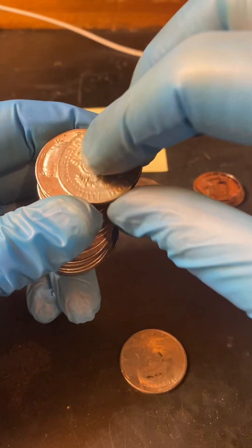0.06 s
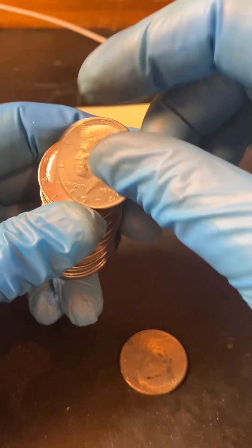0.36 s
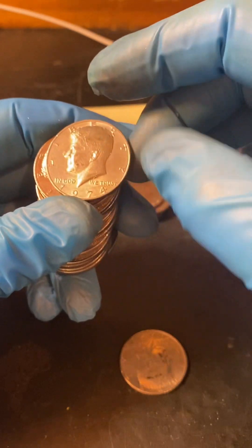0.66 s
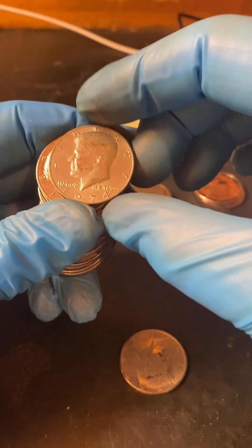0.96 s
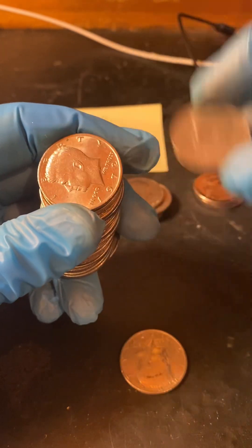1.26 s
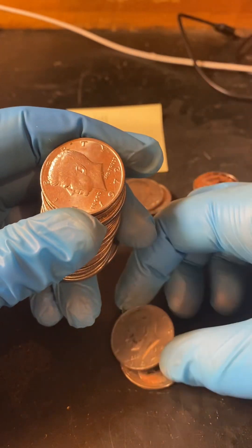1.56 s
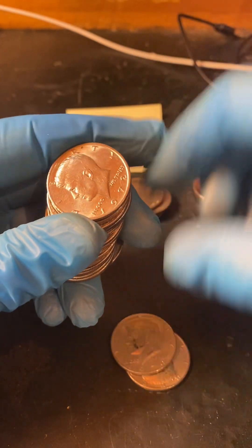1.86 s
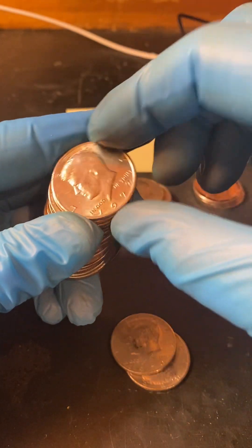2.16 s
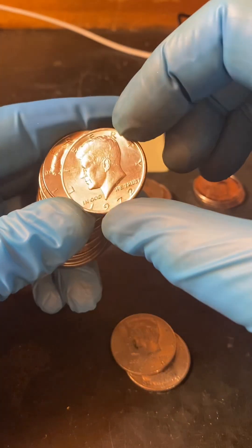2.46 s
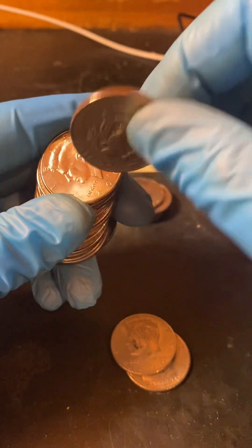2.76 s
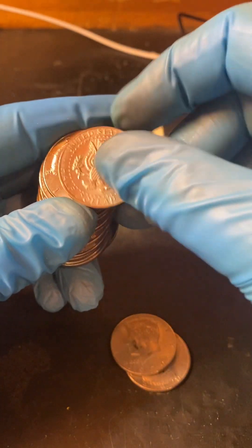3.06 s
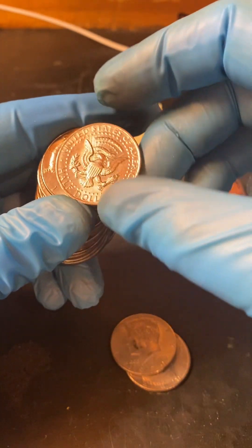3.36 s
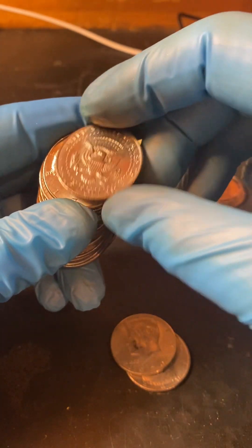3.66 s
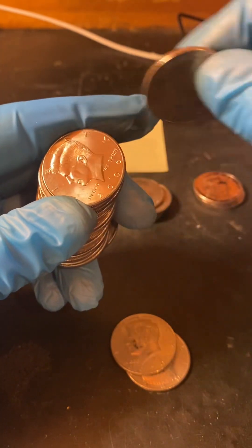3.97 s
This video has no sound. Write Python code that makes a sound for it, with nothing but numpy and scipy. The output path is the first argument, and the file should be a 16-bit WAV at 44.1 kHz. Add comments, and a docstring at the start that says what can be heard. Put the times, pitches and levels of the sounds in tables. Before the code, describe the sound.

Large coins clink and rasp as they are turned over and set on each other.

```python
"""Light clinks sound over a quiet room's hum as gloved hands turn over two large coins on a held stack.
The first is then laid on a coin lying on the table, and the table top thuds beneath it.
Each contact is a crack plus a modal ring that the fingers cut short; milled rims rasp as they slide.
A close two-port microphone ducks after the loudest clinks."""
import sys
import numpy as np
from scipy import signal
from scipy.fft import rfft, irfft, next_fast_len
from scipy.io import wavfile
from scipy.ndimage import uniform_filter1d, minimum_filter1d

SR = 44100
rng = np.random.default_rng(int(sys.argv[2]) if len(sys.argv) > 2 else 0)


def pcm_store(signal):
    """Save signal as 16-bit PCM."""
    levels = np.round(np.clip(np.atleast_2d(signal), -1, 1) * 32767)
    wavfile.write(sys.argv[1], SR, levels.astype(np.int16).T)


N = 176400


def amp(db):
    """Amplitude ratio of a level in decibels."""
    return 10 ** (np.asarray(db) / 20)


def unit(x):
    """Normalisation to rms 1."""
    return x / np.sqrt(np.mean(x ** 2) + 1e-20)


def along(points, hz):
    """Interpolation of (Hz, value) points over log frequency."""
    f, v = np.transpose(points)
    return np.interp(np.log(hz + 1), np.log(f + 1), v)


def filtered(x, response):
    """Linear filtering: the spectrum times a frequency response."""
    n = x.shape[-1]
    m = next_fast_len(n + 8192)
    return irfft(rfft(x, m) * response(np.fft.rfftfreq(m, 1 / SR)), m)[..., :n]


def noise(colour, size, tilt_db=0):
    """Spectral shaping: noise of rms 1, tilted by tilt_db per octave from 3 to 12 kHz."""
    white = rng.standard_normal(size)
    return unit(filtered(white, lambda hz: amp(along(colour, hz) + tilt_db * np.log2(hz.clip(3e3, 12e3)))))


def add(track, s, sound):
    """Superposition of a sound starting at s seconds."""
    i = max(round(s * SR), 0)
    track[i:i + len(sound)] += sound[:max(len(track) - i, 0)]


def ring(modes, t, t60, scatter_db=1.1, detune=.004, rise_s=.0009):
    """Damped free vibration: the modes vary a little with each strike and grip."""
    tones = sum(amp(db + scatter_db * rng.normal())
                * np.sin(2 * np.pi * (hz * (1 + detune * rng.normal()) * t + rng.random()))
                for hz, db in modes)
    return np.sqrt(2) * tones * amp(-60 * t / t60) * (1 - np.exp(-t / rise_s))


def room_tone(mid_db=-35, side_db=-50.5, left_db=1.4):
    """Broadband ventilation noise, with a hum that wavers as narrow-band noise does."""
    # Noise in phase (mid) and in antiphase (side) at the ports. Each row: frequency in Hz, level in dB.
    mid_colour = [(25, -46), (32, -37), (40, -15), (53, -7), (76, -2), (97, -13.5), (130, -4), (157, -12),
                  (212, -13), (310, -14.5), (400, -20.5), (677, -27.5), (1230, -34), (5570, -50.5),
                  (7300, -61), (10500, -59.5), (13500, -75), (16000, -86)]
    side_colour = [(60, -28), (156, -8), (301, -9.5), (698, 0), (1740, -24.5), (2650, -20), (8510, -33),
                   (13900, -47), (16000, -58)]
    # Each row: centre in Hz, level in dB, half-width in Hz.
    hum_bands = [(66.2, -42, 8.2), (132.06, -36, 4.5), (205.5, -48, 14), (471.4, -56, 7), (891, -65.5, 9)]
    mid = amp(mid_db) * noise(mid_colour, N)
    side = amp(side_db) * noise(side_colour, N)
    lean = filtered(mid, lambda hz: (amp(left_db) - 1) * ((hz > 200) & (hz < 1500)))
    hum = sum(amp(db) * unit(filtered(rng.standard_normal(N), lambda f: 1 / (1 + ((f - hz) / width) ** 2)))
              for hz, db, width in hum_bands)
    return np.array([mid + hum + side + lean, mid + hum - side - lean])


def room(x, tail_db=-25, early_db=-14, early_t60=.04):
    """Reflection: early echoes from table and hands, and the room's short reverberation."""
    # Each row: frequency in Hz, reverberation time in seconds.
    decay_times = [(200, .45), (1000, 0.5), (4000, 0.3), (7500, 0.2), (12000, .15)]
    hz, t, spectra = signal.stft(rng.standard_normal((2, SR // 2)), SR, nperseg=256)
    tail = signal.istft(spectra * amp(-60 * t / along(decay_times, hz)[:, None]), SR, nperseg=256)[1]
    t = np.arange(tail.shape[1]) / SR
    early = rng.standard_normal(tail.shape) * amp(-60 * t / early_t60)
    echoes = amp(tail_db) * tail / np.linalg.norm(tail[0])
    echoes += amp(early_db) * early / np.linalg.norm(early[0])
    return signal.fftconvolve(x[None], echoes, axes=1)[:, :N]


def gloves():
    """Friction noise: rubber hisses softly as it is drawn over metal."""
    # Each row: frequency in Hz, level in dB.
    colour = [(500, -22), (2500, -6.5), (5300, 0), (8500, 0), (12000, -1), (14000, -10), (16000, -8)]
    # Each row: middle in seconds, half-length in seconds, level in dB.
    rubs = [(0.12, 0.07, -57), (1.87, 0.031, -46), (3.01, .05, -56.5), (3.714, .08, -59.5)]
    t = np.arange(N) / SR
    return noise(colour, N) * sum(amp(db) * np.exp(-((t - s) / half) ** 2) for s, half, db in rubs)


def knocks():
    """Impact excitation: the table top thuds in its modes under the landing coin."""
    # Each row: start in seconds, gain in dB.
    landings = [(1.497, -32), (1.657, -26), (1.709, -29.5)]
    # Each row: frequency in Hz, level in dB.
    board_modes = [(240, -8), (345, -6), (495, 1), (620, -1), (790, -2), (1080, -9), (1400, -13),
                   (2330, -7)]
    out, t = np.zeros(N), np.arange(SR // 4) / SR
    for s, db in landings:
        add(out, s, amp(db) * ring(board_modes, t, t60=.08))
    return out


def coin_at(s, to_table_s=1.3, second_s=2.0, lifted_s=2.66):
    """Support and grip govern a disc's vibration: its colour, modes, crack rise and ring T60 at time s."""
    # Contact spectra (colours) and resonances (modes). Each row: frequency in Hz, level in dB.
    first_colour = [(300, -26.5), (1400, -19.5), (2300, -7), (3020, -3.5), (3700, -7), (4400, -4),
                    (5050, 6), (6000, -4), (8200, 2), (10000, -4), (12500, -1), (14000, -13), (16000, -15)]
    first_modes = [(5060, -2), (5589, -14), (7750, -12), (8520, -8), (12450, -11), (3030, -14)]
    table_colour = [(200, -20), (480, -5), (1500, -8.5), (2500, -3), (3350, 4.5), (5400, -2.5), (7900, 3),
                    (9600, -5), (12400, 3), (14000, -11), (16000, -22)]
    table_modes = [(7360, -5), (7720, -12), (8030, -13), (12420, -3.5), (12200, -13)]
    second_colour = [(300, -27.5), (1500, -22), (2200, -7), (3200, -11), (4300, -7), (5400, 2), (6600, 2),
                     (8700, 1), (10300, -5), (12100, -1), (13500, -11), (16000, -17)]
    second_modes = [(11940, 1), (11750, -18), (12080, -15), (7650, -14), (8700, -15), (6700, -13),
                    (5420, -20)]
    prised_modes = [(3860, -12), (5179, -6), (8306, -4), (9970, -6), (12130, -1)]
    stack_rise_s, table_rise_s, gripped_t60, loose_t60 = .0009, .000297, .014, .029
    if s < to_table_s:
        return first_colour, first_modes, stack_rise_s, gripped_t60
    if s < second_s:
        return table_colour, table_modes, table_rise_s, loose_t60
    if s < lifted_s:  # the second coin's edge is prised off the stack
        return second_colour, prised_modes, stack_rise_s, gripped_t60
    return second_colour, second_modes, stack_rise_s, loose_t60


def slides(slips_per_s=900, scatter_db=4, slip_t60=.004, hiss=.6, ring_db=-10):
    """Stick-slip friction: a milled rim ticks unevenly, rasping and exciting the coin's modes."""
    # Each row: time of peak pressure, 30 dB swell and 30 dB fade, all in seconds,
    # level in dB, tilt in dB per octave.
    strokes = [(.182, .032, .05, -24.5, -2), (.16, .08, .03, -43, -3), (1.503, .0034, .04, -41, -6),
               (1.073, .025, .05, -43, -4), (1.1, .036, .012, -46.5, 5), (1.667, .028, .06, -19.5, -2.5),
               (1.712, .04, .04, -27, -1), (2.7095, .055, .016, -29, -5), (2.675, .04, .06, -44, -3),
               (2.917, .006, .06, -36, -3), (3.064, .02, .032, -17.5, 1), (3.094, .03, .022, -24, 0),
               (3.857, .06, .022, -27.5, -2)]
    out, t = np.zeros(N), np.arange(SR // 2) / SR
    middle, short = t[-1] / 2, t[:SR // 20]
    for s, swell, fade, db, tilt_db in strokes:
        colour, modes, *_ = coin_at(s)
        slipping = rng.random(len(t)) < slips_per_s / SR
        slips = slipping * amp(scatter_db * np.clip(rng.standard_normal(len(t)), -2, 2))
        grain = unit(signal.fftconvolve(slips, amp(-60 * short / slip_t60))[:len(t)])
        rasp = unit((grain + hiss) * noise(colour, len(t), tilt_db))
        singing = unit(signal.fftconvolve(slips, ring(modes, short, t60=.014))[:len(t)])
        # Pressure swells, then drops ever faster as the coin stops.
        pressure = amp(-30 * np.where(t < middle, (middle - t) / swell, ((t - middle) / fade) ** 2))
        sound = amp(db) * pressure * (rasp + amp(ring_db) * singing)
        add(out, s - middle, sound[max(round((middle - s) * SR), 0):])
    return out


def clinks(crack_t60=.0085):
    """Impact of coin on coin: a broadband crack and a damped modal ring."""
    # Each row: start in seconds, level in dB, crack tilt in dB per octave, relative ring gain in dB.
    contacts = [ (.086, -27.5, 10, -4.5), (.124, -43, 2, -4), (.158, -33, 6, -8), (.172, -20, -1, -8),
                (.194, -20.5, 4, 4), (.201, -21, -0.5, -2), (.212, -19.5, -3, -1), (.2938, -20, 0.5, 6),
                (.355, -22, -1, 2), (.367, -26.5, 2.5, -1), (.418, -41, 1, -2), (.431, -31, 1, -4),
                (.4425, -25, 5, -9), (.4482, -18.5, 4.5, -4), (.9688, -34, 2, -1),
                (1.4967, -11.5, -2.5, -20), (1.5017, -24, -3, -10), (1.639, -34.5, -3, -8),
                (1.645, -19, -2.5, 2), (1.6525, -15, -3, 2), (1.6567, -9.5, -1, -3), (1.6636, -10, 3, 10.5),
                (1.668, -15, 1, 1), (1.683, -22, -1, 2), (1.690, -18, 3, 2), (1.699, -22, 5, 1),
                (1.7044, -14.5, 1.5, 1), (1.710, -14, 1, -2), (1.727, -18, 1.5, -4), (1.740, -24, 2.5, -6),
                (1.750, -29, 5, -8), (2.169, -44.5, -0.5, -15), (2.407, -44.5, -1.5, -18),
                (2.618, -28, 4, 5), (2.6435, -17, 10.5, -2), (2.655, -21.5, 1, -4), (2.712, -27, -2, -3),
                (2.9085, -10.5, 2.5, -18), (3.041, -40, 0.5, -1), (3.0525, -17.5, 4, 7.5),
                (3.0595, -13.5, 3.5, 13), (3.0665, -9.5, 4, -2), (3.0745, -16, 0, 1), (3.0895, -17.5, 3, 5),
                (3.098, -23, -1, -7), (3.2752, -33, 5, -2), (3.417, -47, -2, -15),
                (3.4545, -49.5, 6.5, -17), (3.7945, -27, 0, -2), (3.856, -17, -1.5, -14),
                (3.863, -24, 0, -11)]
    out, t = np.zeros(N), np.arange(SR // 6) / SR
    for s, db, tilt_db, ring_db in contacts:
        colour, modes, rise, t60 = coin_at(s)
        envelope = amp(-60 * t / crack_t60) * (1 - np.exp(-(t / rise) ** 2))
        crack = noise(colour, len(t), tilt_db) * envelope / envelope.max()
        add(out, s, amp(db) * (crack + amp(ring_db) * ring(modes, t, t60)))
    return out


def scene():
    """Superposition: direct sound reaches the two ports out of phase, over echoes and room hum."""
    # Each row: frequency in Hz, phase lead of the left port in radians.
    port_phase = [(100, 1), (2500, 1.5), (5200, 0.93), (7100, 2.5), (9000, 5), (10700, 6), (11900, 7.6),
                  (12400, 8.2), (16000, 10)]
    coins = clinks() + knocks() + slides() + gloves()
    direct = filtered(coins, lambda hz: np.exp(.5j * along(port_phase, hz) * np.array([[1], [-1]])))
    return direct + room(coins) + room_tone()


def record(dry):
    """Limiting: the gain ducks on loud clinks, holds and recovers; a steep low-pass follows."""
    limit_db, hold_s, recover_db_per_s, top_hz = -9.5, .105, 100, 15900
    power = np.abs(uniform_filter1d(np.mean(dry ** 2, axis=0), size=88))  # 2 ms average
    cut_db = np.maximum(10 * np.log10(power + 1e-12) - limit_db, 0)
    hold = 2 * int(hold_s * SR / 2) + 1
    held = -minimum_filter1d(-cut_db, hold, origin=hold // 2)
    ramp = recover_db_per_s * np.arange(N) / SR
    gain_db = ramp - np.maximum.accumulate(held + ramp)
    limited = dry * amp(uniform_filter1d(gain_db, size=44))
    return filtered(limited, lambda hz: 1 / np.sqrt(1 + (hz / top_hz) ** 120))


dry = scene()
out = record(dry)
pcm_store(out)
```